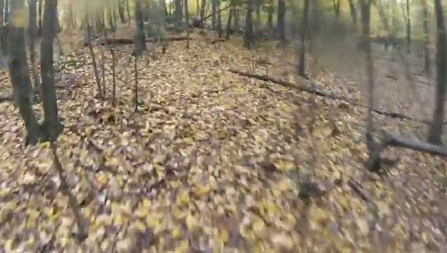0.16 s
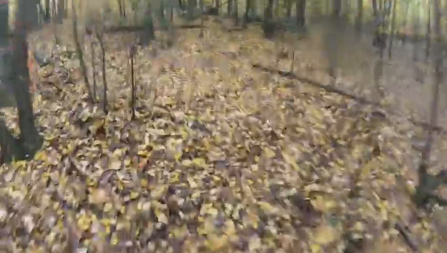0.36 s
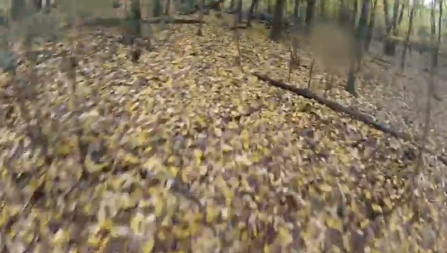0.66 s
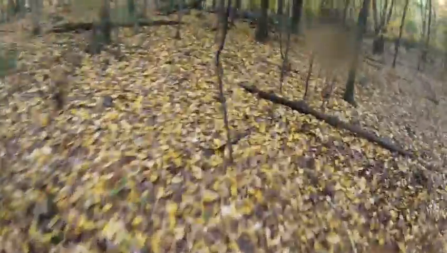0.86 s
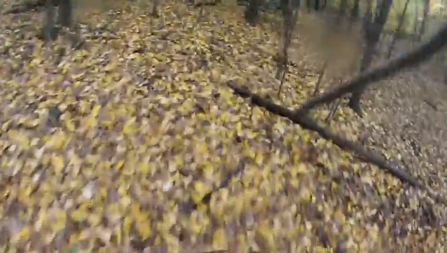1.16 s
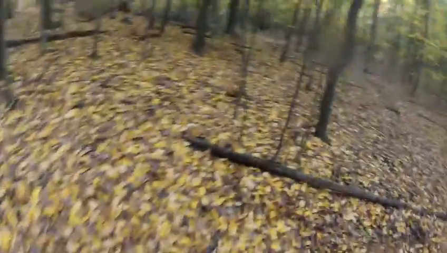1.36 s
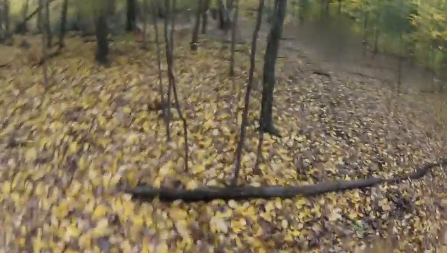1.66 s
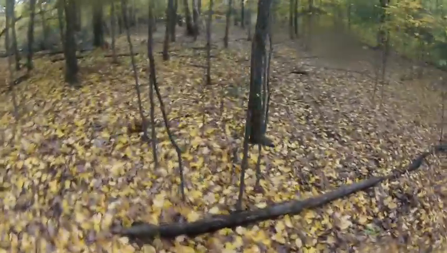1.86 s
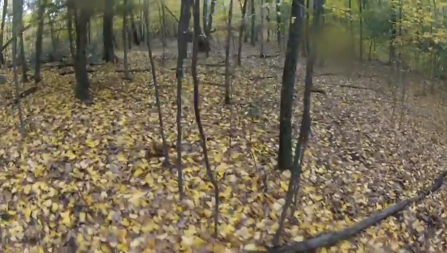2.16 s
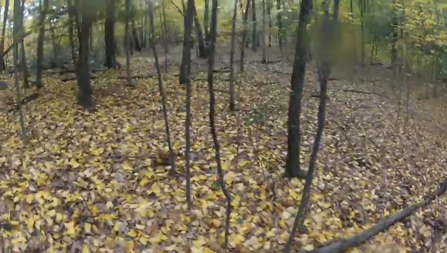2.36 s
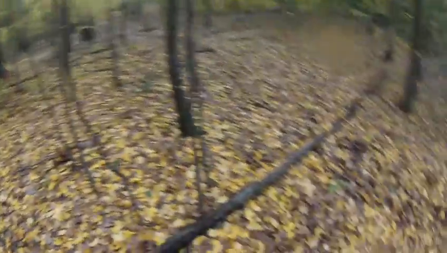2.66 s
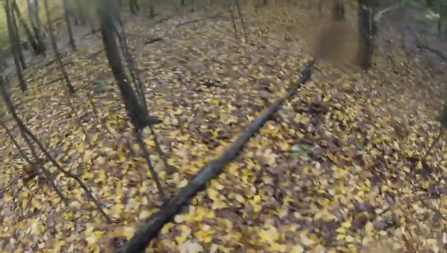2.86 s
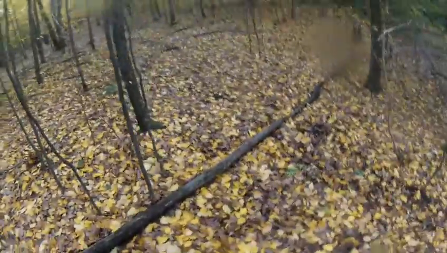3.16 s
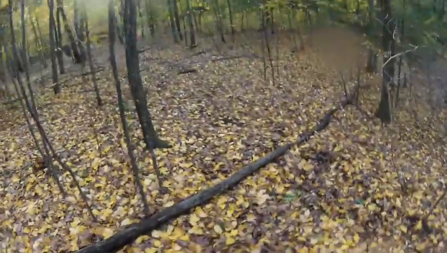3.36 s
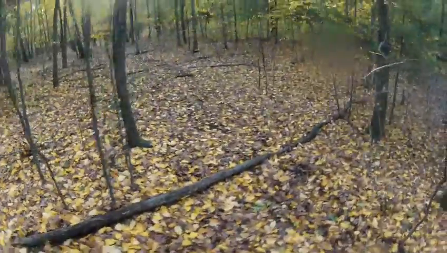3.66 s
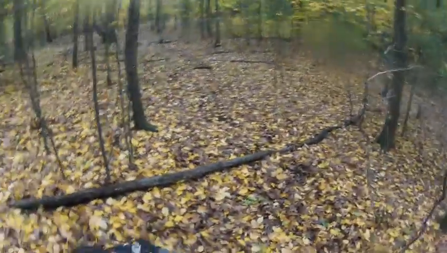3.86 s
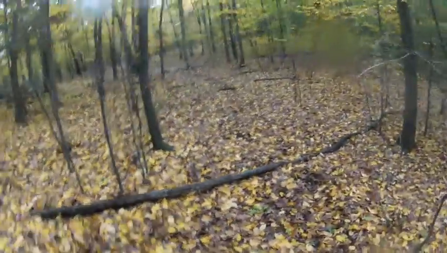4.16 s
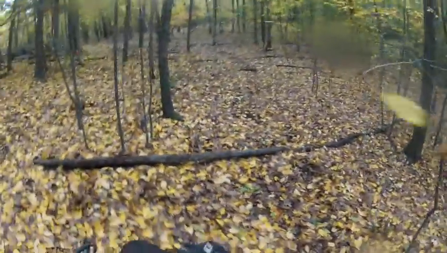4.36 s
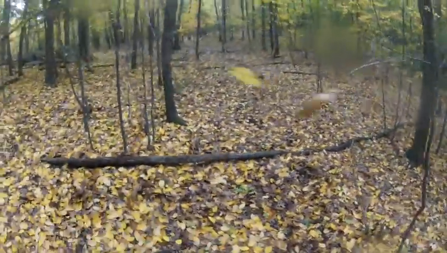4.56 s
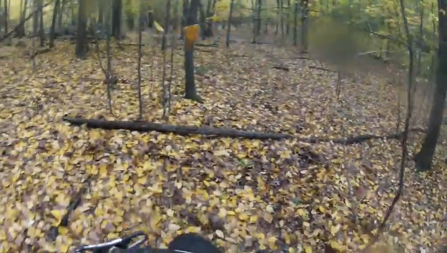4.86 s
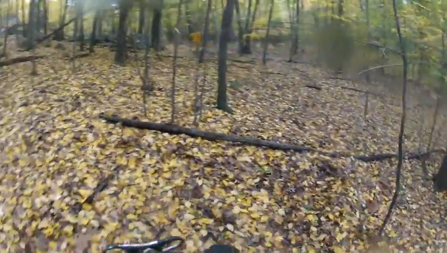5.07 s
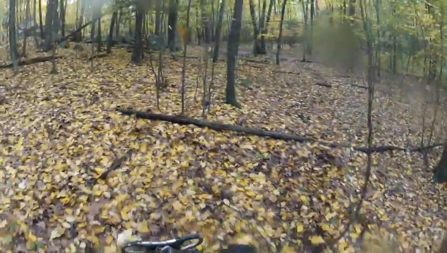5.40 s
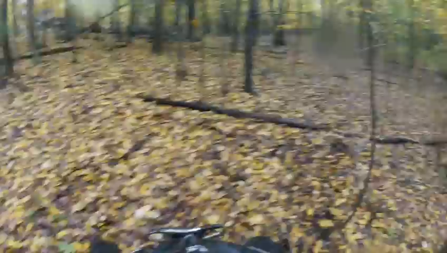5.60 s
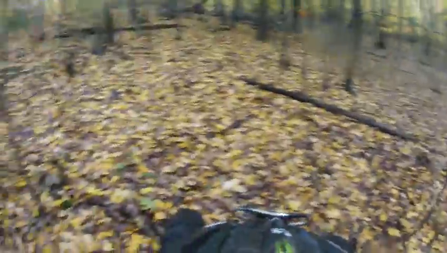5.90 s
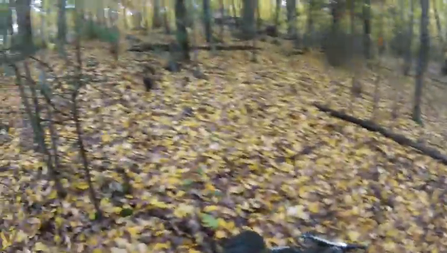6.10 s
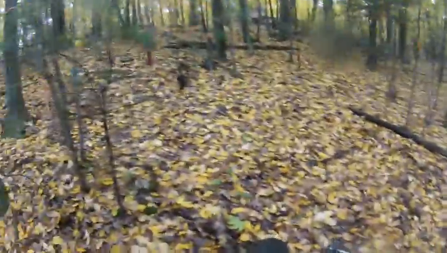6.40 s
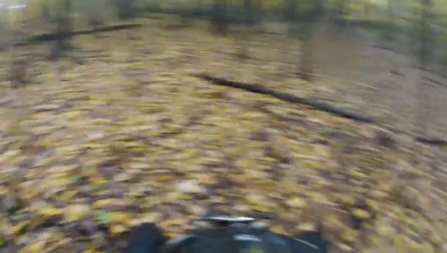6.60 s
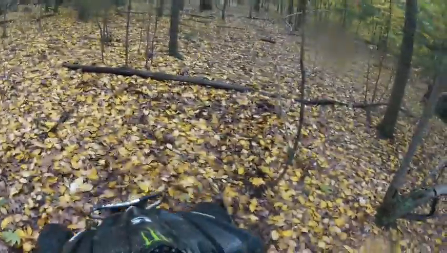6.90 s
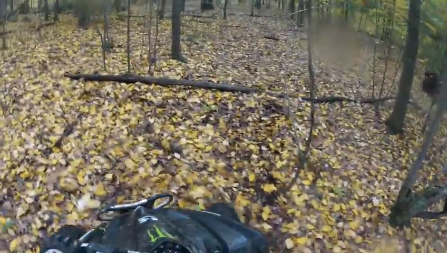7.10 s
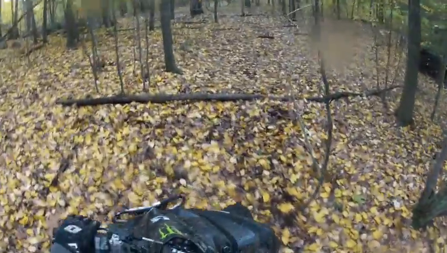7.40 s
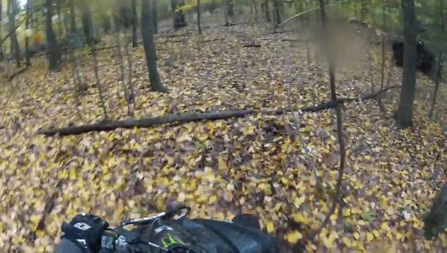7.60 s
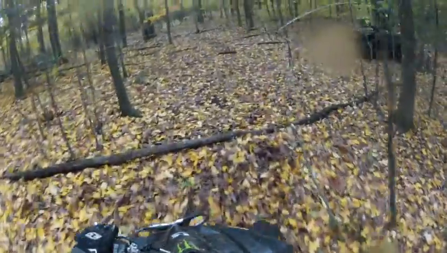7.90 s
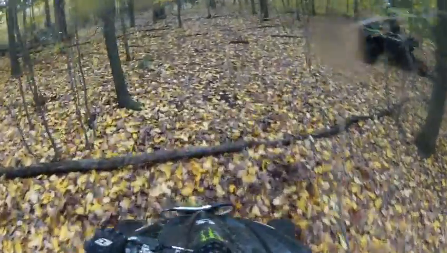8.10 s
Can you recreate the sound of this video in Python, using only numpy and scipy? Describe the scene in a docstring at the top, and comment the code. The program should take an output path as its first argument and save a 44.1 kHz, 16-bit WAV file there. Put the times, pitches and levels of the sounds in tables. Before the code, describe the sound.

A single-cylinder quad bike runs at low revs throughout, heard close from the rider's position, with a thumping exhaust and clattering valves. It revs briefly at the start, then drops. From about 0.35 to 0.7 seconds, branches strike and scrape the microphone in a quick run of sharp cracks. The loudest blow lands just after 1 second with a low thud, briefly ducking the engine. The engine labours near 1.8 seconds, then settles to a steady chug, with a soft low boom swelling around 2.6 to 3 seconds. Twigs snap faintly under the tyres near 2.5, 4.2 and 5.3 seconds. The rack gives short ringing knocks at 5.7 and 5.9 seconds, and a faint whine rises until about 7. The throttle is blipped at 6.8 seconds; the engine dips, then runs slightly faster and louder until the end, just after 8 seconds.

```python
"""A single-cylinder quad bike crawling over dry leaves in a wood, close up on the rider's camera mic.
It idles and is blipped twice: exhaust and intake thump, the valve gear clatters and slaps when it lugs.
Jolts set the camera mount swaying. Early on, branches strike and scrape the housing, right at the mic,
and the loudest blows duck its gain. Later the rack rattles and twigs snap under the tyres. Mono."""
import sys
import numpy as np
from scipy import signal
from scipy.fft import rfft, irfft
from scipy.io import wavfile
from scipy.ndimage import uniform_filter1d, minimum_filter1d

SR = 44100
rng = np.random.default_rng(int(sys.argv[2]) if len(sys.argv) > 2 else 0)


def dump_mix(stems):
    """Bounce the given channels to the path in sys.argv[1] as a 16-bit WAV at rate SR."""
    frames = np.atleast_2d(stems).T  # one column per channel
    limited = np.clip(frames, -1, 1)  # hard clip at full scale
    pcm = np.round(limited * 32767).astype(np.int16)
    wavfile.write(sys.argv[1], SR, pcm)


N = 363825
TIME = np.arange(N) / SR
EXHAUST_LEAD = 0.0451  # share of a cycle by which the thump leads the clatter


# the puff and its echoes along the pipe: delay/s, signed size
PIPE_ECHOES = [(0, 1.0), (.0041, -.45), (.0076, .5), (.0121, .45), (.0163, -.55)]
# silencer resonances: f/Hz, width/Hz, level/dB
SILENCER_MODES = [(99.4, 79, 5.5), (162, 240, -23.5), (225, 17, 1.5), (261.5, 7.8, 1)]
# panels shaken by each firing: f/Hz, width/Hz, level/dB
PANEL_MODES = [(543.4, 12, 5.5), (722, 14, 3), (1070, 64, -0.5)]

def thump(cycles, revs):
    """Below the rider, each firing puffs down the pipe and rings it; the airbox gulps harder with revs."""
    firing = strokes(cycles, 0, scatter_db=.9)
    puffs = sum(size * np.interp(TIME - delay, TIME, firing, left=0) for delay, size in PIPE_ECHOES)
    airbox = band(band(strokes(cycles, 0.1662, scatter_db=3.5), 234, 75), 259, 110)
    pipe = unit(body(puffs, SILENCER_MODES)) + undb(-9 + 7.9 * revs) * unit(airbox)
    pipe = signal.sosfilt(signal.butter(8, 320, fs=SR, output="sos"), pipe)
    shakes = strokes(cycles, 0.037, scatter_db=0.5) + .5 * strokes(cycles, 0.71, scatter_db=4)
    panels = body(shakes, PANEL_MODES)
    gas = colour(pulsing_noise(cycles, 0.17, depth_db=0.5),
                 [(40, -8), (80, -3.5), (130, -3.5), (290, 7.5), (345, -14), (900, -34), (3000, -59)])
    return unit(unit(pipe) + undb(-19 + 11 * revs) * unit(panels) + undb(-10.5) * unit(gas))


# engine case and camera housing resonances: f/Hz, width/Hz, level/dB
CASE_MODES = [(970, 130, -3.5), (1138, 42, 4.5), (1782, 153, 2), (1850, 77, -14), (2270, 66, 2),
              (3070, 17, -6), (3400, 73, -16.5), (8360, 130, -12), (9780, 126, -8), (10180, 89, -14),
              (10740, 66, -15), (13640, 690, -14), (14400, 350, -31)]
# colour of the rush in the clatter: f/Hz, level/dB
RUSH_COLOUR = [(200, -0.5), (560, -2.5), (820, -13.5), (1100, 2.5), (1400, -5.5), (1900, -1.5), (2400, -2),
               (2750, -15.5), (3700, -8), (4300, -27), (7500, -22.5), (9800, -16), (12000, -27.5),
               (14300, -33)]

def clatter(cycles, revs, slap_gain, links=48, gear_teeth=42):
    """Tappets slap and the cam chain ticks one uneven round a cycle, over fan rush and a gear's whine."""
    taps = sum(size * strokes(cycles, share, scatter_db=0.5)
               for share, size in [(.02, 0.8), (.1, 0.89), (.2, 1), (.93, 0.55)])
    ticks = sum(strokes(cycles, (k + offset) / links, scatter_db=4) * rng.choice([-1, 1])
                for k, offset in enumerate(rng.random(links)))
    chain = unit(body(ticks * swell(cycles, 0.14, depth_db=1.5), CASE_MODES))
    rush = unit(colour(pulsing_noise(cycles, 0.056, depth_db=2), RUSH_COLOUR))
    tap_decay = signal.lfilter([1], [1, -np.exp(-1 / (0.0074 * SR))], taps)
    rasp = colour(rng.standard_normal(N) * tap_decay,
                  [(300, 1), (1100, 0.5), (2400, 1), (4300, -13), (6000, -10.5), (7500, -15.5),
                   (10000, -16.5), (15000, -20)])
    slap = undb(2.5) * unit(body(taps, CASE_MODES)) + unit(rasp)
    gear = np.sin(2 * np.pi * gear_teeth * cycles + 2.2 * walk(70)) * undb(3.4 * walk(30))
    steady = chain + undb(2.5) * rush + undb(-17.5 + 17 * np.minimum(revs, .5)) * gear
    steady -= .65 * band(steady, 6000, 600)  # a hollow that only hard slaps fill
    return unit(steady + slap_gain * unit(slap)) * undb(0.66 * walk(11))


def lugging(firing_hz, lug_hz=18, release_s=0.35):
    """1 while the engine turns too slowly, falling to 0 once it has picked up."""
    since = TIME - np.maximum.accumulate(np.where(firing_hz < lug_hz, TIME, -10))
    return uniform_filter1d(np.exp(-(since / release_s) ** 2), size=4096)


# engine firing rate: t/s, f/Hz
FIRING_RATE = [(0.0, 25.9), (0.12, 30.81), (0.31, 22.41), (0.63, 16.65), (0.74, 22.8), (1.26, 22.51),
               (1.81, 13.24), (1.98, 18.65), (3.51, 19.56), (4.63, 18.43), (5.01, 19.03), (6.52, 19.05),
               (6.78, 33.87), (6.98, 20.18), (7.1, 16.53), (7.33, 23.64), (8.08, 25.38), (8.25, 20.86)]
# engine load, apart from the revs: t/s, thump level/dB, clatter level/dB
ENGINE_LOAD = [(0.0, -42, -41.5), (0.95, -44, -44.5), (1.3, -41.5, -42.5), (2.0, -45.5, -48),
               (3.0, -44, -45.5), (4.9, -41.5, -46), (5.5, -42.5, -45), (6.8, -40.5, -44),
               (7.2, -39, -43.5), (8.05, -37.5, -41.5), (8.25, -42, -41.5)]

def engine(idle_hz=19, clatter_db_per_octave=2.5, free_slap_db=-15.5, lug_slap_db=6.5, full_load_db=-35):
    """The single cylinder, from the saddle: one firing cycle times the thump, clatter, boom and whine."""
    firing_hz = curves(FIRING_RATE)[0]
    cycles = np.cumsum(firing_hz) / SR - .28
    revs = np.log2(firing_hz / idle_hz)  # octaves above idle
    thump_db, clatter_db = curves(ENGINE_LOAD)
    slap_gain = undb(free_slap_db) + lugging(firing_hz) * undb(lug_slap_db + thump_db - full_load_db)
    exhaust = undb(thump_db) * thump(cycles + EXHAUST_LEAD, revs)
    valve_gear = undb(clatter_db + clatter_db_per_octave * revs) * clatter(cycles, revs, slap_gain)
    return exhaust + valve_gear + boom(cycles, thump_db) + whine(cycles, clatter_db)


# swell of the boom: t/s, drive level/dB, hold/s
BOOM_SWELLS = [(2.6, -43, 0.45)]

def boom(cycles, thump_db, rest_db=-25):
    """A low boom behind the beat, which swells once and fades."""
    beat = unit(strokes(cycles + EXHAUST_LEAD, 0.062, scatter_db=1.5))
    drive = beat + undb(-2) * unit(pulsing_noise(cycles, 0.11, depth_db=2))
    gain = surges(BOOM_SWELLS, attack_s=0.68, release_s=0.79) + undb(thump_db + rest_db)
    return undb(-1.5) * unit(band(band(drive, 147, 37), 173, 110)) * gain


# swell of the whine: t/s, level/dB, hold/s
WHINE_SWELLS = [(5.65, -56.5, 1.45)]

def whine(cycles, clatter_db, rest_db=-12.5):
    """A diffuse whine goes with the clatter and grows for a while."""
    tone = unit(band(band(pulsing_noise(cycles, 0, depth_db=2.5), 709, 55), 696, 130))
    return tone * np.hypot(undb(clatter_db + rest_db), surges(WHINE_SWELLS, attack_s=0.2, release_s=0.2))


# branches striking the camera: t/s, level/dB, length/s, relative thud/dB, ring drive/dB, squeak f/Hz
BRANCH_BLOWS = [(0.3529, 1.5, 0.0051, 1, -32, 2240), (0.3785, -4.5, 0.0053, -8, -5, 3720),
                (0.4023, -20, 0.0068, -20, -15, 2980), (0.4806, -20.5, 0.012, -19, -31, 1750),
                (0.4987, -4, 0.012, -6.5, -15, 2375), (0.543, -7.5, 0.0043, -23, -13.5, 745),
                (.569, -0.5, 0.0025, -22, -25, 1980), (0.6014, -8.5, 0.011, -8, -13.5, 2000),
                (.627, -4, 0.0057, -34, -21.5, 1960), (0.6676, -15, 0.0064, -15, -24, 2260),
                (1.029, 0.5, 0.0084, 1.5, -19.5, 1000), (1.0498, 15, 0.0046, -1.5, -21, 1983),
                (1.0769, -6.5, 0.015, 2, -19, 1125)]
# colour of a blow on the housing: f/Hz, level/dB
HOUSING_COLOUR = [(150, -32.5), (450, -16), (780, -8.5), (1300, -1.5), (1900, 3.5), (2400, 7), (2850, -3.5),
                  (3700, -3.5), (4600, -12.5), (6200, -16), (8200, -12), (10400, -6), (12000, -49.5),
                  (14000, -8)]
# ring of the mount's metal screw: f/Hz, level/dB, t60/s
SCREW_MODES = [(3650, 3, 0.032), (3640, -12, .025), (8350, -2.5, 0.033), (2234, -27.5, .018)]

def branch_blows():
    """Right at the mic, each blow cracks and squeaks, thuds through the mount and rings its screw."""
    out, t = np.zeros(N), np.arange(4096) / SR
    ring = sum(undb(db) * np.sin(2 * np.pi * hz * t) * undb(-60 * t / t60) for hz, db, t60 in SCREW_MODES)
    push = np.sin(2 * np.pi * 125 * t) * np.exp(-t / 0.0045)
    mount_colour = [(40, -2.5), (130, 0.5), (230, 5), (350, -3), (480, 2), (700, -1.5), (930, 4),
                    (1300, -6), (4000, -27.5)]
    for s, db, length, thud_db, ring_db, squeak_hz in BRANCH_BLOWS:
        crack = knock(length, HOUSING_COLOUR)
        squeak = burst(band(band(contact(length), squeak_hz, 130), squeak_hz, 900), length)
        thud = undb(-2) * push + knock(length, mount_colour)
        blow = crack + undb(-2) * squeak + undb(thud_db) * thud + undb(ring_db + 8.5) * ring
        add(out, s, undb(db) * blow)
    return out


# a branch dragging over the housing: t/s, length/s, level/dB
BRANCH_DRAGS = [(0.359, 0.018, -15.5), (0.504, 0.114, -17.5)]
# bark resonances: f/Hz, width/Hz, level/dB
BARK_MODES = [(775, 130, -3), (1900, 86, -4)]

def branch_scrapes(slips_per_s=240, slip_s=0.0023, scatter_db=2.5, bark_db=-4):
    """A branch sticks and slips across the camera: uneven ticks ring the housing and the bark."""
    out = np.zeros(N)
    for s, length, db in BRANCH_DRAGS:
        force = np.zeros(SR // 4)
        for k, (late, size) in enumerate(rng.standard_normal((int(length * slips_per_s) + 1, 2))):
            at = np.clip((k + .3 * late) / slips_per_s, 0, length)
            force += undb(scatter_db * size) * np.roll(contact(slip_s, size=len(force)), int(at * SR))
        housing = burst(colour(force, HOUSING_COLOUR), length)
        bark = burst(body(force, BARK_MODES), length)
        add(out, s, undb(db) * np.sqrt(2) * (housing + undb(bark_db) * bark))
    return out


# jolts reaching the camera mount: t/s, level/dB, hold/s
MOUNT_JOLTS = [(0.47, -29.5, 0.0092), (0.74, -35, 0.27), (1.08, -8.5, 0.048), (1.4, -37, 0.096),
               (1.68, -36, 0.082), (2.12, -39, 0.18), (2.6, -33, 0.023), (4.0, -36.5, 0.027),
               (6.63, -40, 0.03), (7.32, -36, 0.067)]

def mount_sway(ground_db=-46):
    """Handling noise: the camera sways on its mount at one low, unsteady pitch, in a dull rumble."""
    rumble = colour(rng.standard_normal(N),
                    [(10, -1), (25, 0), (55, -5.5), (95, -23.5), (400, -64.5)], size=4096)
    sway = np.sqrt(2) * np.sin(wandering_phase(hz=42.4, wander_hz=2, rate=3.6))
    ground = undb(ground_db + 1.5 * walk(3.7))  # the ground keeps it swaying a little
    jolts = surges(MOUNT_JOLTS, attack_s=0.042, release_s=0.065)
    return (sway + undb(-8) * unit(rumble)) * np.hypot(ground, jolts) * undb(walk(16))


# knocks of the rack: t/s, level/dB, length/s, relative dull body/dB
RACK_KNOCKS = [(5.677, -30.5, 0.0071, -8), (5.691, -25, 0.0077, -7), (5.904, -34.5, 0.0056, 5),
               (5.918, -36, 0.012, 2)]

def rack_rattle():
    """Near the rider, the rack knocks over bumps: a ring with a dull body."""
    out = np.zeros(N)
    modes = [(1100, 44, 7), (2330, 80, 6), (3200, 250, -31), (9670, 180, -7), (13700, 840, -19)]
    for s, db, length, dull_db in RACK_KNOCKS:
        dull = knock(length, [(200, -16), (600, -2), (1000, 3), (2200, 0), (4000, -31), (12000, -20)])
        ring = burst(body(contact(length), modes), length)
        add(out, s, undb(db) * (ring + undb(dull_db) * dull))
    return out


# the larger twigs: t/s, level/dB, length/s
TWIG_SNAPS = [(1.671, -52.5, 0.032), (2.484, -43.5, 0.0066), (4.192, -45, 0.0098), (4.28, -52, .005),
              (5.216, -49, 0.0093), (5.318, -48, 0.025)]

def twigs_and_leaves(small_twigs=8, small_db=-60, small_s=0.008, crackles_per_s=120):
    """Down on the woodland floor, twigs snap and leaves crackle lightly under the tyres."""
    out = np.zeros(N)
    snap = [(1000, -40.5), (2800, -2.5), (5500, -1.5), (7200, -5), (9500, -15), (15000, -37.5)]
    for s, db, length in TWIG_SNAPS:
        add(out, s, undb(db) * knock(length, snap))
    for s in rng.random(small_twigs) * TIME[-1]:
        add(out, s, undb(small_db) * knock(small_s, snap))
    leaves = (rng.random(N) < crackles_per_s / SR) * rng.standard_normal(N) * undb(3.7 * walk(3.4))
    return out + undb(-70.5) * unit(colour(leaves, snap))


# partials of the whistle: harmonic number, level/dB
WHISTLE_PARTIALS = [(2, -71.5), (3, -63), (4, -70.5), (5, -76.5)]

def motor_whistle():
    """Faint in the background, a small electric motor, perhaps the fuel pump, whistles at its own speed."""
    phase = wandering_phase(hz=778.3, wander_hz=1.5, rate=5)
    partials = (undb(db + 2.9 * walk(9)) * np.sin(round(k) * phase) for k, db in WHISTLE_PARTIALS)
    return np.sqrt(2) * sum(partials)


def undb(db):
    """Decibels to gain."""
    return 10 ** (np.asarray(db) / 20)


def unit(x):
    """Scale to rms 1."""
    return x / np.sqrt(np.mean(x ** 2))


def curves(table):
    """The columns of a table, joined by straight lines in time."""
    s, *columns = np.transpose(table)
    return [np.interp(TIME, s, c) for c in columns]


def surges(table, attack_s, release_s):
    """A gain that rises to each row's level by its time, holds and dies away."""
    power = 0
    for s, db, hold in table:
        early, late = np.maximum(s - TIME, 0), np.maximum(TIME - s - hold, 0)
        power += (undb(db) * np.exp(-(early / attack_s) ** 2 - late / release_s)) ** 2
    return np.sqrt(power)


def band(x, hz, width_hz):
    """One resonance, gain 1 at its centre."""
    return signal.lfilter(*signal.iirpeak(hz, hz / width_hz, fs=SR), x)


def body(x, modes):
    """Resonances (f/Hz, width/Hz, level/dB) driven together."""
    return sum(undb(db) * band(x, hz, width) for hz, width, db in modes)


def colour(x, points, size=1024):
    """Minimum-phase filter through (f/Hz, level/dB) points."""
    hz, db = np.transpose(points)
    f = np.maximum(np.fft.rfftfreq(size, 1 / SR), 1)
    cepstrum = irfft(np.log(undb(np.interp(np.log(f), np.log(hz), db))))
    cepstrum[1:size // 2] *= 2
    cepstrum[size // 2 + 1:] = 0
    return signal.oaconvolve(x, irfft(np.exp(rfft(cepstrum))))[:len(x)]


def walk(rate):
    """Smooth random drift of rms 1, `rate` steps a second."""
    k = int(SR / rate)
    steps = np.repeat(rng.standard_normal(N // k + 1), k)
    return unit(uniform_filter1d(uniform_filter1d(steps, k), k)[:N])


def wandering_phase(hz, wander_hz, rate):
    """Phase of a tone whose pitch drifts."""
    return 2 * np.pi * np.cumsum(hz + wander_hz * walk(rate)) / SR


def add(out, s, sound):
    """Mix a sound in at a time."""
    i = int(s * SR)
    out[i:i + len(sound)] += sound[:N - i]


def contact(length, size=4096):
    """A brief rough contact: a burst of random force."""
    return rng.standard_normal(size) * np.exp(-(np.arange(size) / SR / length) ** 2)


def burst(x, length):
    """Scale a short sound to the energy of rms 1 over half its length."""
    return x * np.sqrt(length * SR / 2 / np.sum(x ** 2))


def knock(length, points):
    """One contact, coloured by what it hits."""
    return burst(colour(contact(length), points), length)


def strokes(cycles, share, scatter_db):
    """One impulse of uneven size each time the cycle passes a given point."""
    at = np.flatnonzero(np.diff(np.floor(cycles - share)) > 0)
    out = np.zeros(N)
    out[at] = undb(scatter_db * rng.standard_normal(256)[:len(at)])
    return out


def swell(cycles, share, depth_db):
    """A gain that rises and falls once a cycle."""
    return undb(depth_db * np.cos(2 * np.pi * (cycles - share)))


def pulsing_noise(cycles, share, depth_db):
    """White noise that swells once a cycle."""
    return rng.standard_normal(N) * swell(cycles, share, depth_db)


def scene():
    """Engine, branches, mount and ground at one microphone on the rider."""
    foreground = engine() + branch_blows() + branch_scrapes() + mount_sway()
    return (foreground + rack_rattle() + twigs_and_leaves() + motor_whistle())[None]


def record(dry, limit_db=-10, hold_s=0.046, release_db_per_s=190, attack_s=0.0068, top_hz=15400):
    """The camera's gain control ducks after loud blows, holds and recovers; their first instants clip."""
    x = dry[0]
    level_db = 10 * np.log10(np.abs(uniform_filter1d(x ** 2, size=88)) + 1e-12)
    over_db = np.maximum(level_db - limit_db, 0)
    half_hold = int(hold_s * SR) // 2
    held_db = -minimum_filter1d(-over_db, 2 * half_hold + 1, origin=half_hold)
    ramp = release_db_per_s * TIME
    duck_db = np.maximum.accumulate(held_db + ramp) - ramp
    pole = np.exp(-1 / (attack_s * SR))
    gain = undb(-signal.lfilter([1 - pole], [1, -pole], duck_db))
    clipped = np.clip(x * gain, -1, 1)
    return signal.sosfilt(signal.ellip(8, .2, 70, top_hz, fs=SR, output="sos"), clipped)[None]


dry = scene()
out = record(dry)
dump_mix(out)
```